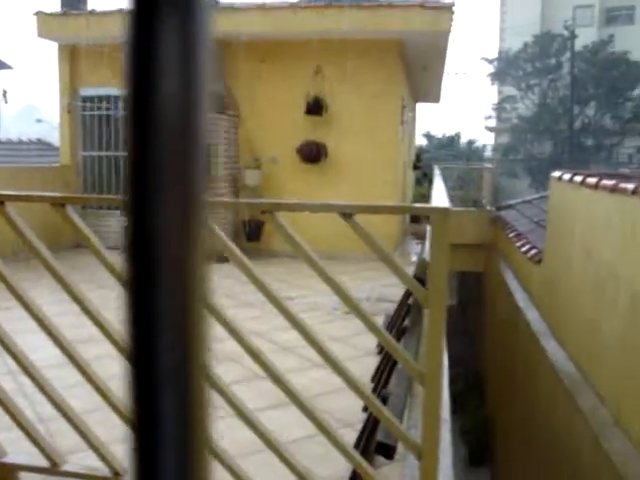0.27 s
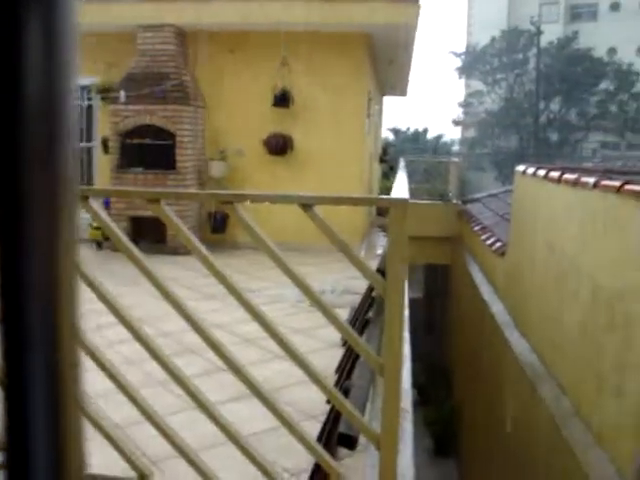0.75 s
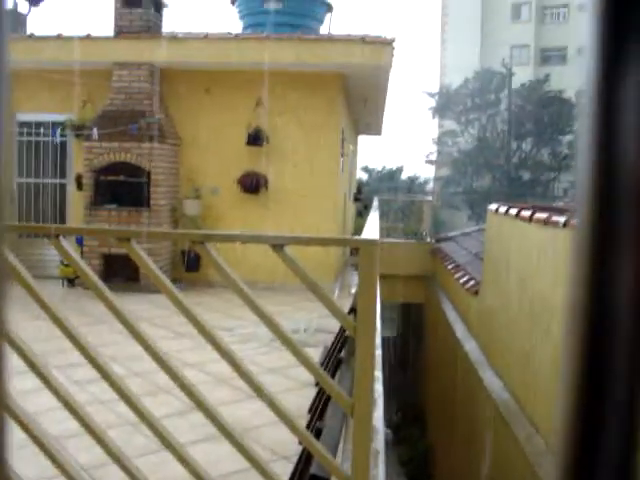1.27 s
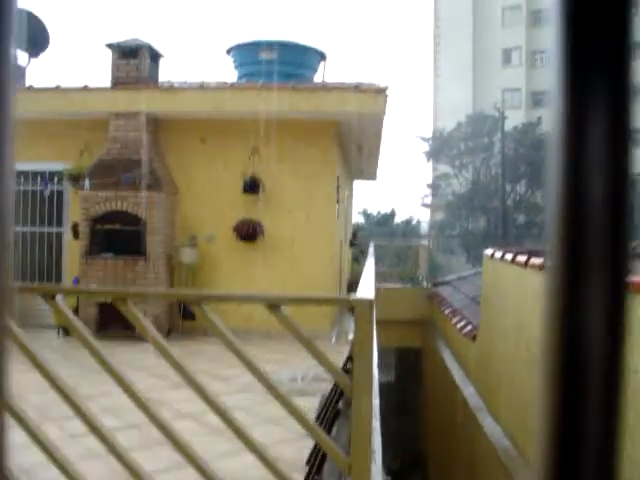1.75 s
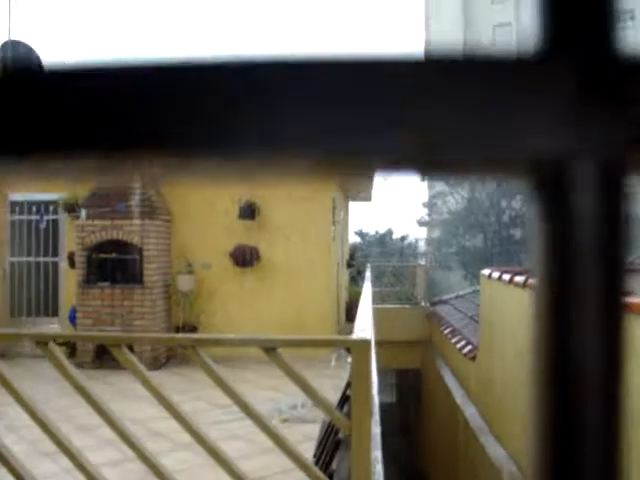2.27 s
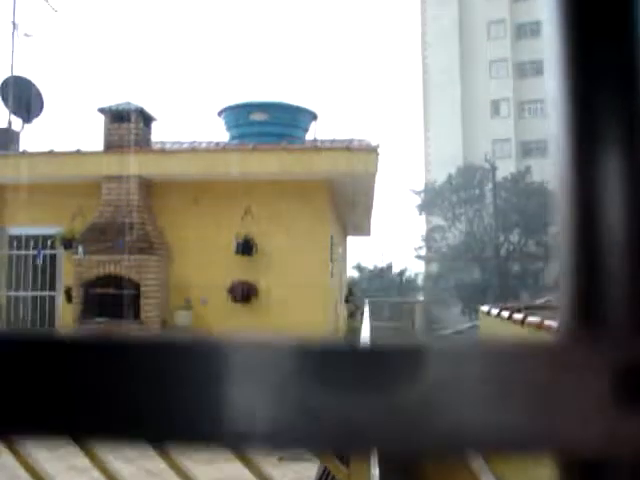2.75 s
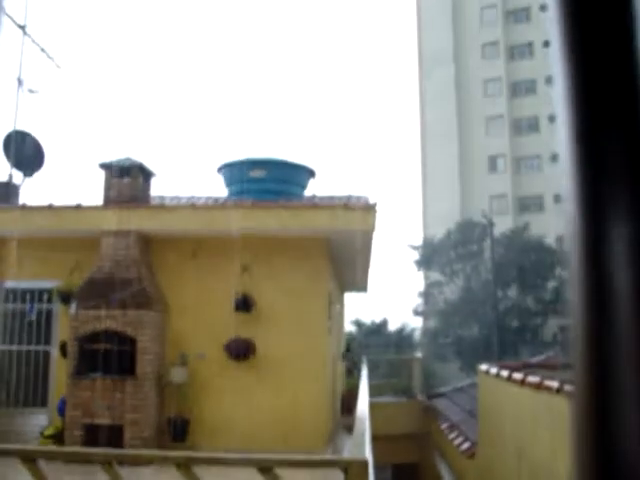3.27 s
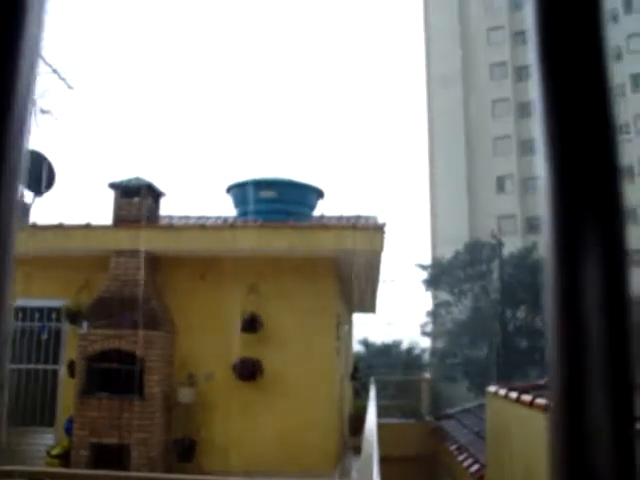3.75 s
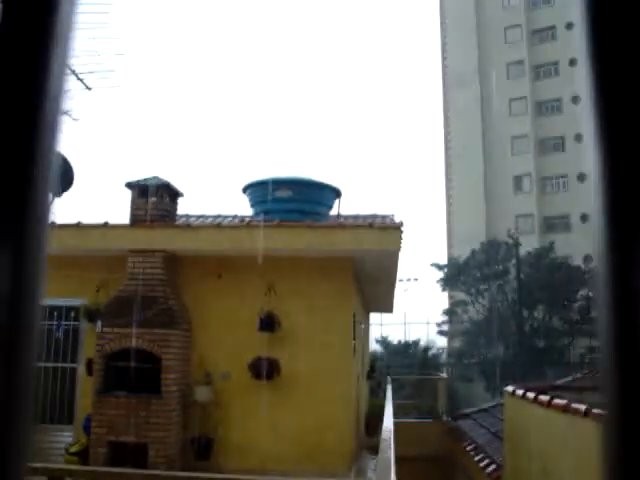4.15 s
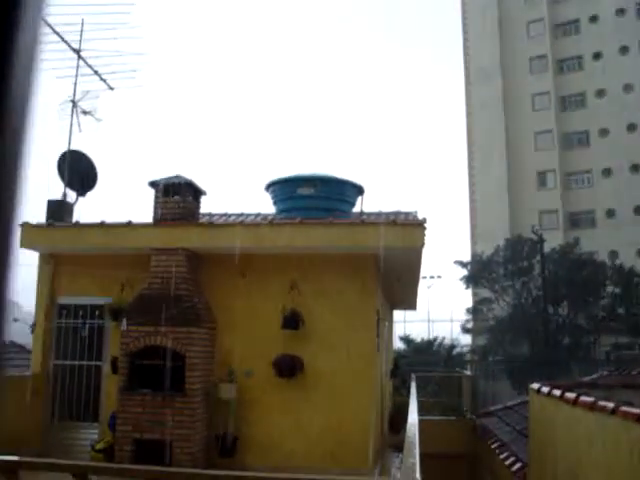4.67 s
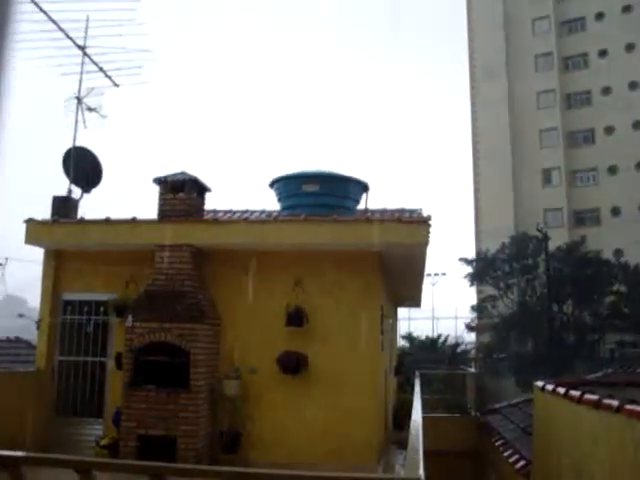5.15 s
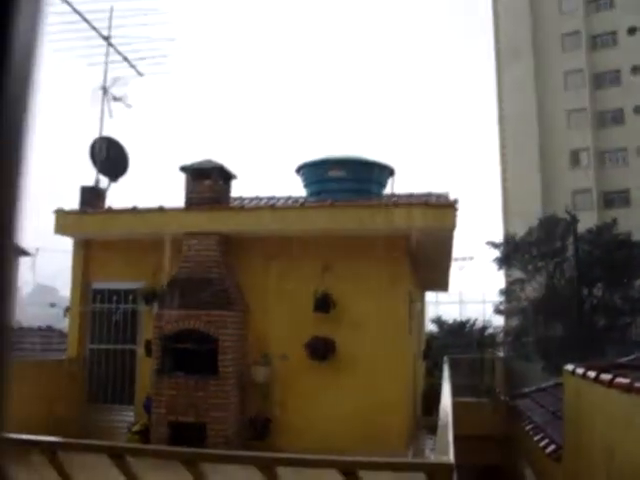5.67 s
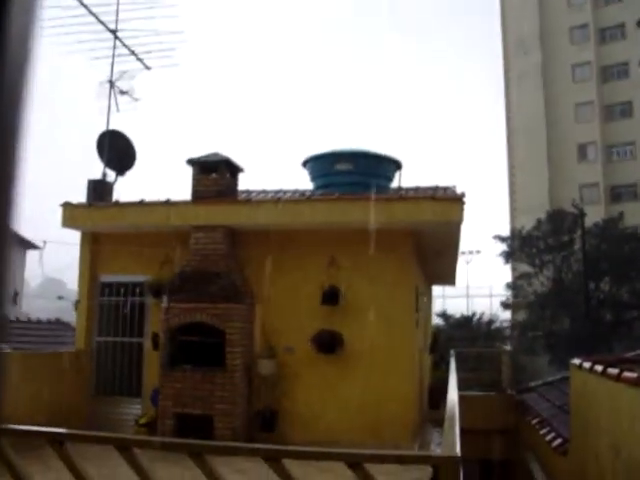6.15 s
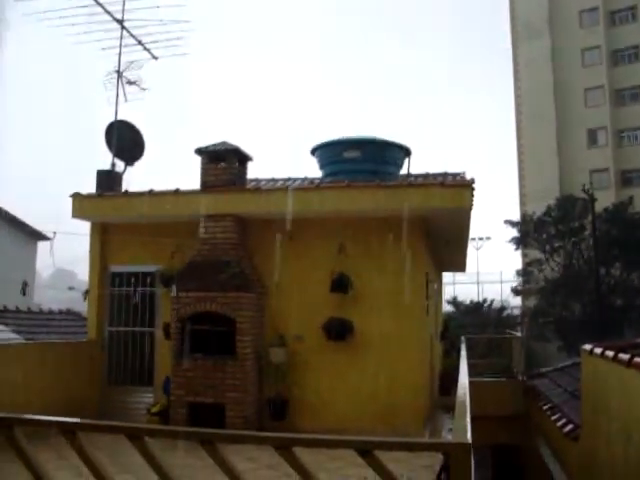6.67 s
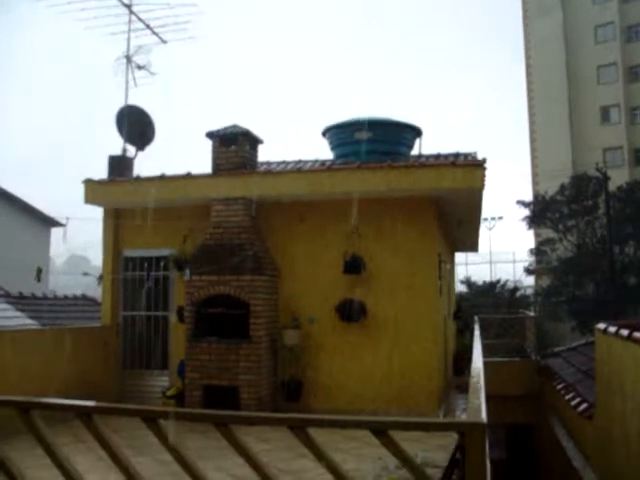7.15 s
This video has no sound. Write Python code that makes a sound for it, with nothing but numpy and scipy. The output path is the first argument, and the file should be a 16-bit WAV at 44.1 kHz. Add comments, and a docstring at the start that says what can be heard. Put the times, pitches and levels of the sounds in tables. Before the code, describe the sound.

Rain falls steadily on a tiled terrace, heard from a barred window through a small mono camera. A dense, even hiss runs throughout and grows slightly. Fine patter covers it, while runoff from the eaves splashes on wet tiles in uneven gushes. Irregular drips slap brightly, and the closest drops burst with a sharp tick, a short spray and a soft low bump.

```python
"""A hiss of far rain runs throughout, growing slightly, heard from a barred window over tiles and clay roofs.
The hiss is shaped noise; single drops patter over it as a thick train of tiny clicks.
Water running off the eaves slaps and sprays on the wet tiles: each splash is a cloud of droplets dying away.
The nearest drops burst with a tick and a hiss of spray, and give the microphone a soft low push.
All of it passes through a small mono camera that keeps only the sound below about 10 kHz."""
import sys
import numpy as np
from scipy import signal
from scipy.fft import rfft, irfft
from scipy.io import wavfile
from scipy.ndimage import uniform_filter1d

SR = 44100
rng = np.random.default_rng(int(sys.argv[2]) if len(sys.argv) > 2 else 0)


def to_wav(s):
    """Save 16-bit WAV."""
    ch = np.atleast_2d(s).T  # columns
    pcm = np.round(np.clip(ch, -1, 1) * 32767)  # PCM
    wavfile.write(sys.argv[1], SR, pcm.astype(np.int16))


N = 326781  # length in samples, about 7.4 s
EDGE_HZ = 10040  # upper edge of the sound


def gain_of(db):
    """Turns decibels into a plain multiplier."""
    return 10 ** (np.asarray(db) / 20)


def evened(x):
    """Scales a signal to an average strength (rms) of 1."""
    return x / np.sqrt(np.mean(x ** 2) + 1e-20)


def read(points, hz):
    """Reads a spectrum in dB at any pitch, joining its points by straight lines over log frequency."""
    point_hz, point_db = np.transpose(points)
    return np.interp(np.log(hz + 1), np.log(point_hz + 1), point_db)


def add(mix, start_s, sound):
    """Adds a sound into the mix at a given time, cutting off what runs past the end."""
    start = max(round(start_s * SR), 0)
    part = mix[start:][:len(sound)]
    part += sound[:len(part)]


def coloured(x, points, ripple_db=0, count=50):
    """Gives x a spectrum, with random humps a few hundred Hz wide; rms 1."""
    hz = np.fft.rfftfreq(len(x), 1 / SR)
    humps = np.interp(hz, np.linspace(0, SR / 2, count), rng.standard_normal(count))
    gain = gain_of(read(points, hz) + ripple_db * humps) * (hz < EDGE_HZ)
    return evened(irfft(rfft(x) * gain, len(x)))


def sputter(rate_hz):
    """A smooth random rise and fall, mostly slower than rate_hz; rms 1."""
    hz = np.fft.rfftfreq(N, 1 / SR)
    band = hz / rate_hz * np.exp(-(hz / rate_hz) ** 2)
    return evened(irfft(rfft(rng.standard_normal(N)) * band, N))


def droplets(size, per_s, spread_db):
    """A dense train of tiny impacts of uneven size, pushing the air either way."""
    hit = rng.random(size) < per_s / SR
    sign = rng.choice([-1, 1], size)
    strength = np.minimum(rng.exponential(1, size), 3)
    return hit * sign * gain_of(spread_db * strength)


def splash(points, fall_s, ripple_db, size=5000):
    """One drop shatters: a sudden cloud of droplets that thins out, with a faint echo off the walls."""
    t = np.arange(size) / SR
    rise = 1 - np.exp(-t / 0.0008)
    fall = np.exp(-t / fall_s) + 0.02 * np.exp(-t / 0.045)  # the slower, weak part is the echo
    fade_out = np.minimum((t[-1] - t) / 0.035, 1)
    cloud = coloured(droplets(size, per_s=11000, spread_db=2.5), points, ripple_db)
    return rise * fall * cloud * fade_out


def shower(points, per_s, spread_db, fall_s, ripple_db, count=120):
    """Splashes of many colours falling at random moments; rms 1."""
    out = np.zeros(N)
    chance, which, strength = rng.random(N), rng.integers(0, count, N), rng.exponential(1, N)
    kinds = [splash(points, fall_s * rng.uniform(0.81, 2.54), ripple_db) for _ in range(count)]
    for i in np.flatnonzero(chance < per_s / SR):
        loudness = gain_of(spread_db * min(strength[i], 2.5))
        add(out, i / SR, loudness * kinds[which[i]])
    return evened(out)


# Colour of the far rain's hiss: pitch_hz [Hz], level_db [relative dB per Hz]
WASH_SPECTRUM = [(20, -27), (65, -18), (130, -10), (170, -10), (250, -4.5), (370, -1), (800, -3),
                 (1300, -3.5), (2800, -7), (5800, -9.5), (7800, -3.5), (8900, -2.5), (9600, -8.5),
                 (10000, -8.5)]
# Narrow peaks and dips that tint the hiss: pitch_hz [Hz], width_hz [Hz], level_db [dB]
HISS_PEAKS = [(171, 16.5, 6.5), (236, 12, 4), (248, 16, -5.5), (340, 20, 1.5), (488, 31, -1.5),
              (596, 20, 2), (670, 50, -1), (792, 65, 2.5)]
WASH_DB = -26


def wash():
    """Countless far drops merge into a hiss with an uneven low colour; it grows slightly, the bass most."""
    hz = np.fft.rfftfreq(N, 1 / SR)
    peaks_db = sum(level_db / (1 + (2 * (hz - pitch_hz) / width_hz) ** 2)
                   for pitch_hz, width_hz, level_db in HISS_PEAKS)
    tinted = irfft(rfft(rng.standard_normal(N)) * gain_of(peaks_db), N)
    hiss = coloured(tinted, WASH_SPECTRUM)
    bass = irfft(rfft(hiss) / (1 + (hz / 260) ** 4), N)
    growth = np.linspace(-1, 1, N)
    growing_bass = bass * gain_of(1.7 * growth)
    growing_rest = (hiss - bass) * gain_of(0.63 * growth)
    return gain_of(WASH_DB) * (growing_bass + growing_rest)


def flicker(x):
    """The highest hiss flickers quickly in level, apart from the rest."""
    hz = np.fft.rfftfreq(N, 1 / SR)
    top = irfft(rfft(x) / (1 + (6300 / (hz + 1)) ** 16), N)
    wobble_band = hz / (30 + hz) * np.exp(-(hz / 90) ** 2)
    wobble = evened(irfft(rfft(rng.standard_normal(N)) * wobble_band, N))
    return x + top * (gain_of(1.3 * wobble) - 1)


def patter():
    """Single raindrops tick on the tiles and the railing, too thickly for any to stand out."""
    ticks = droplets(N, per_s=900, spread_db=2.2)
    # pitch_hz, level_db
    spectrum = [(300, -22), (1200, -3.5), (3000, 3.5), (8000, 4.0), (10000, -14)]
    return gain_of(-31.0) * coloured(ticks, spectrum)


# Colour of water slapping wet tile: pitch_hz [Hz], level_db [relative dB per Hz]
SLAP_SPECTRUM = [(200, -40), (1100, -21.5), (1800, -7), (2300, -2.5), (2800, -1), (3600, -0.5),
                 (4500, -3.5), (5500, -4), (8000, -15.5), (10000, -30)]
# Colour of the fine spray thrown up, also by drips and near drops: pitch_hz [Hz], level_db [relative dB per Hz]
SPRAY_SPECTRUM = [(200, -30.5), (1500, -30), (3000, -10.5), (5200, -7.5), (6400, -4), (7200, -0.5),
                  (8300, 0), (9100, -5.5), (10000, -10.5)]
# Flow of water off the eaves: time_s [s], level_db [dB around the usual flow]
EAVES_FLOW = [(0.0, -0.5), (0.53, -3.5), (0.67, 1.1), (1.01, -3.5), (1.81, -0.5), (3.06, -1), (3.26, 3.5),
              (3.52, -4), (3.71, 3), (4.06, -4), (4.2, 4), (4.72, -2), (4.86, 3.1), (5.24, -0.7), (6.28, 0),
              (6.6, 2.5), (6.83, -1.7), (7.41, 0.5)]
SLAPS_DB, SPRAY_DB = -28.5, -26  # the small splashes at usual flow
SPRAY_FOLLOWS = 0.51  # dB of spray per dB of flow
# the water comes down in uneven gushes
SPUTTER_HZ, SLAP_SPUTTER_DB, SPRAY_SPUTTER_DB = 8.1, 1.5, 1.14


def runoff():
    """Small splashes under the eaves swell and weaken with the flow and sputter at random."""
    flow_db = np.interp(np.arange(N) / SR, *np.transpose(EAVES_FLOW))
    slaps = shower(SLAP_SPECTRUM, per_s=170, spread_db=2.5, fall_s=0.014, ripple_db=3.0)
    spray = shower(SPRAY_SPECTRUM, per_s=240, spread_db=1.0, fall_s=0.0092, ripple_db=4.5)
    slap_db = SLAPS_DB + flow_db + SLAP_SPUTTER_DB * sputter(SPUTTER_HZ)
    spray_db = SPRAY_DB + SPRAY_FOLLOWS * flow_db + SPRAY_SPUTTER_DB * sputter(SPUTTER_HZ)
    return slaps * gain_of(slap_db) + spray * gain_of(spray_db)


DRIP_FALL_S, DRIP_SPRAY_FALL_S = 0.032, 0.033
# half width of a slap, and the pitch below which the water film hardly sounds
SLAP_OCTAVES, SLAP_LOWEST_HZ = 0.48, 1850
IMPACT_OVER, IMPACT_S = 0.5, 0.0013  # the first instant of a slap is the hardest


def drip(slap_db, pitch_hz, spray_db):
    """A drip slaps the film of water on the tiles, around its own pitch, and throws a little spray."""
    hz = np.geomspace(200, 10000, 60)
    octaves = np.log2(hz / pitch_hz)
    # a broad resonance with steep skirts
    loss = (1 + (octaves / SLAP_OCTAVES) ** 4) * (1 + (SLAP_LOWEST_HZ / hz) ** 8)
    spectrum = np.transpose([hz, -10 * np.log10(loss)])
    slap = splash(spectrum, fall_s=DRIP_FALL_S, ripple_db=2.0)
    impact = 1 + IMPACT_OVER * np.exp(-np.arange(len(slap)) / SR / IMPACT_S)
    spray = splash(SPRAY_SPECTRUM, fall_s=DRIP_SPRAY_FALL_S, ripple_db=0.0)
    return gain_of(slap_db) * impact * slap + gain_of(spray_db) * spray


# The biggest drips from the eaves: start_s [s], slap_db [dB], pitch_hz [Hz, centre of the slap], spray_db [dB]
BIG_DRIPS = [(0.194, -17.5, 4030, -22), (0.832, -23, 2560, -27), (0.875, -25, 3010, -36),
             (0.913, -21, 2450, -36), (0.969, -19, 3780, -35), (1.317, -20.5, 2960, -28),
             (1.367, -19, 3470, -25), (1.605, -20, 3960, -30), (1.808, -21.5, 3900, -36),
             (1.934, -26, 3820, -19), (2.039, -23.5, 3300, -32), (2.51, -21, 2800, -24),
             (2.565, -19, 3180, -27), (2.811, -21, 3460, -23), (2.976, -24, 4200, -30),
             (3.217, -25, 2800, -21), (3.262, -21.5, 2850, -30), (3.316, -19, 2980, -26),
             (3.587, -21, 4160, -23), (3.689, -28, 3670, -25), (4.191, -20.5, 2800, -28),
             (4.252, -19.5, 2700, -27), (4.483, -20, 4120, -23), (4.505, -18, 4550, -32),
             (4.914, -19.5, 2480, -28), (5.147, -20.5, 3610, -33), (5.284, -18, 2450, -27),
             (5.439, -20.5, 3850, -34), (5.588, -21.5, 2850, -23), (5.689, -26, 3480, -26),
             (5.899, -19.5, 3570, -24), (6.291, -18, 3440, -22), (6.343, -24, 2830, -23),
             (6.429, -19, 3570, -33), (6.87, -20.5, 3200, -22), (6.946, -22, 3550, -34),
             (7.247, -19, 4470, -34), (7.345, -18, 3550, -30)]
# lesser drips vary around one slap level, pitch and spray level
LESSER_PER_S, LESSER_SLAP_DB, LESSER_HZ, LESSER_SPRAY_DB = 5, -28.5, 3430, -32


def drips():
    """Big drips fall from the eaves, with lesser ones of varied size and pitch loosely spaced among them."""
    out = np.zeros(N)
    for start_s, slap_db, pitch_hz, spray_db in BIG_DRIPS:
        add(out, start_s, drip(slap_db, pitch_hz, spray_db))
    variations = rng.uniform(-1, 1, (int(LESSER_PER_S * N / SR), 3))
    for k, (late, size, pitch) in enumerate(variations):
        start_s = (k + 0.5 + late / 2) / LESSER_PER_S
        size_db = 4.0 * size
        pitch_hz = LESSER_HZ * 2 ** (0.4 * pitch)
        add(out, start_s, drip(LESSER_SLAP_DB + size_db, pitch_hz, LESSER_SPRAY_DB + size_db))
    return out


def tick(fall_s, size=600):
    """The first contact of a drop: a sharp crack, then a smaller one as its rim collapses."""
    t = np.arange(size) / SR
    later = t - rng.uniform(0.0017, 0.0031)
    rim = 0.27 * (later > 0) * np.exp(-abs(later) / fall_s)
    shape = np.exp(-t / fall_s) + rim
    return shape * coloured(rng.standard_normal(size), SPRAY_SPECTRUM)


# The nearest drops, for their pushes and bursts: start_s [s], spray_db [dB], tick_db [dB], push_db [dB]
NEAR_DROPS = [(0.203, -25, -11, -23), (0.2757, -19.5, -24, -32), (0.4445, -26, -2, -28),
              (1.021, -21.5, -4.5, -20), (1.301, -18.5, -16, -42), (1.3234, -30, -19, -31),
              (1.7033, -18.5, -18, -24), (2.0983, -19.5, -22, -26), (2.732, -21, -25, -32),
              (2.8357, -21, -20, -32), (3.5186, -23, -3, -23), (4.2106, -35, -19, -25),
              (4.5056, -33, -16, -24), (4.9311, -31, -7, -27), (5.1828, -24, -22, -29),
              (5.2084, -34, -7, -32), (5.4456, -24, -20, -35), (5.5902, -28, -20, -31),
              (6.4588, -18.5, -21, -24), (6.6751, -22, -20, -30), (7.0047, -17, -20, -24)]


def pushes():
    """Each near burst gives the microphone a one-sided low push that sags back; lesser drops nudge it."""
    kicks = gain_of(-50) * abs(droplets(N, per_s=7.3, spread_db=5.5))
    for start_s, _, _, push_db in NEAR_DROPS:
        add(kicks, start_s, [gain_of(push_db)])
    t = np.arange(SR // 4) / SR
    push_shape = (1 - np.exp(-t / 0.0031)) * np.exp(-t / 0.023)
    pressure = signal.oaconvolve(kicks, push_shape)[:N]
    lumps = 1 + 0.12 * evened(uniform_filter1d(rng.standard_normal(N), size=260))
    # removing the slowest motion makes the push sag back
    high_pass = signal.butter(1, 5, "highpass", fs=SR, output="sos")
    return signal.sosfilt(high_pass, pressure * lumps)


def bursts():
    """Near drops shatter with a sharp tick and a longer hiss of spray."""
    out = np.zeros(N)
    for start_s, spray_db, tick_db, _ in NEAR_DROPS:
        add(out, start_s, gain_of(spray_db) * splash(SPRAY_SPECTRUM, fall_s=0.039, ripple_db=1.8))
        add(out, start_s, gain_of(tick_db) * tick(fall_s=0.00027))
    return out


def scene():
    """Adds up all the rain at one microphone, the same in both channels."""
    hiss = flicker(wash() + runoff())
    rain = hiss + patter() + drips() + pushes() + bursts()
    return np.array([rain, rain])


def record(dry):
    """The camera's steep band limit removes everything above its upper edge."""
    low_pass = signal.firwin(1023, EDGE_HZ, window=("kaiser", 9), fs=SR)
    return signal.oaconvolve(dry, low_pass[None], "same")


dry = scene()
out = record(dry)
to_wav(out)
```